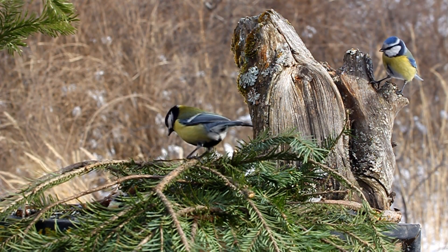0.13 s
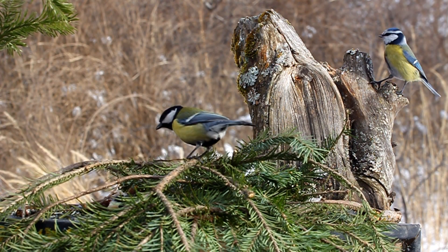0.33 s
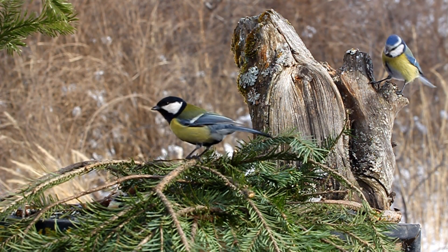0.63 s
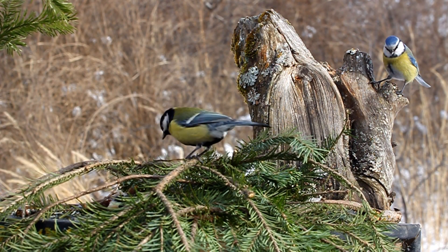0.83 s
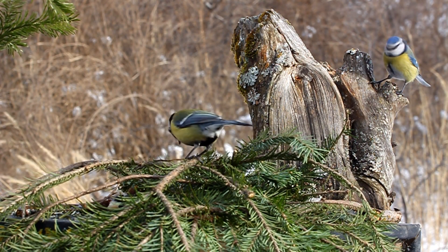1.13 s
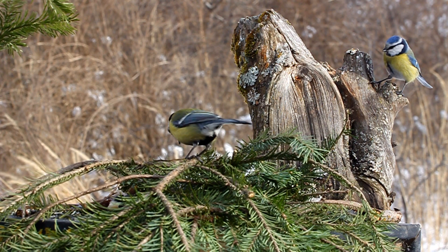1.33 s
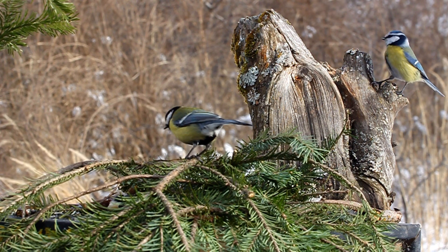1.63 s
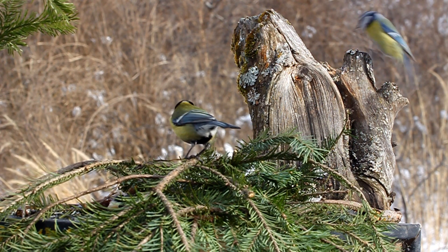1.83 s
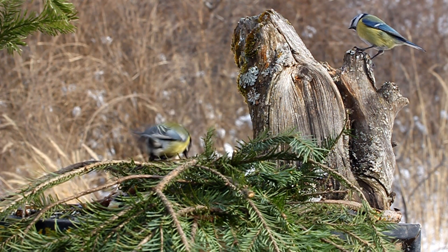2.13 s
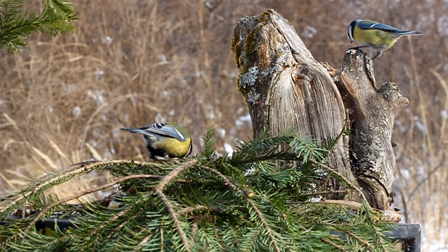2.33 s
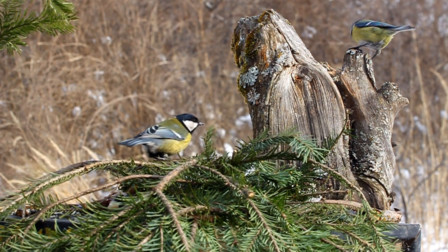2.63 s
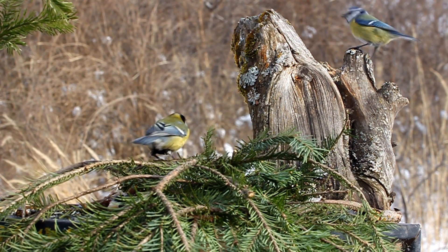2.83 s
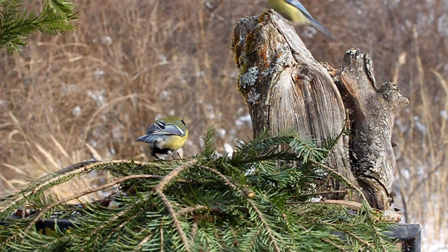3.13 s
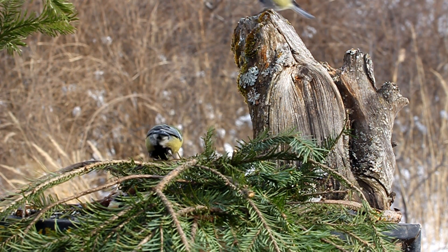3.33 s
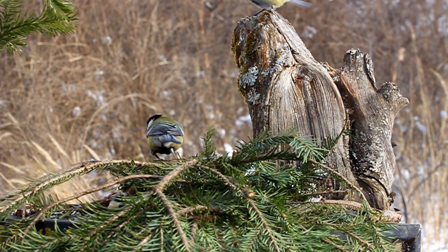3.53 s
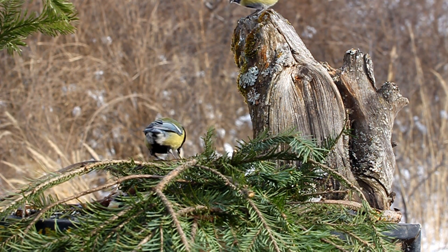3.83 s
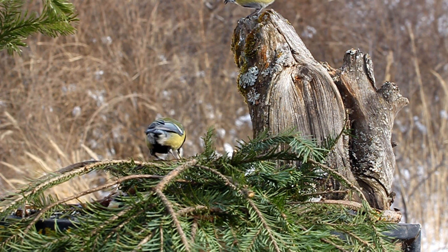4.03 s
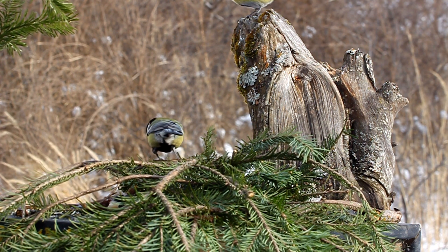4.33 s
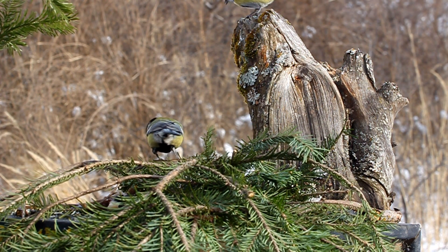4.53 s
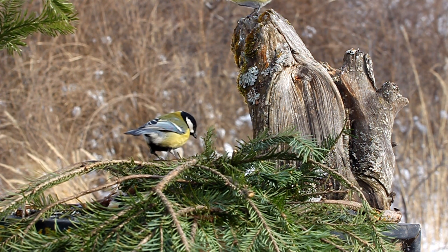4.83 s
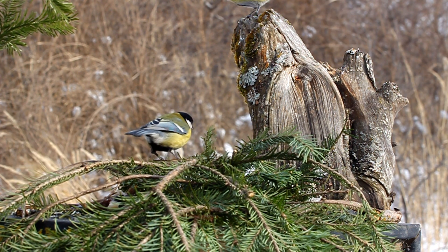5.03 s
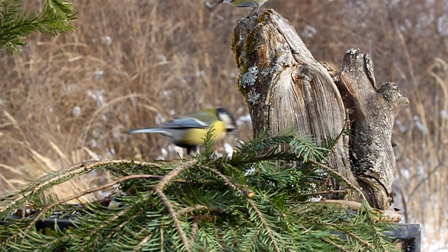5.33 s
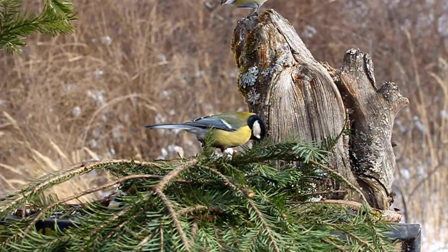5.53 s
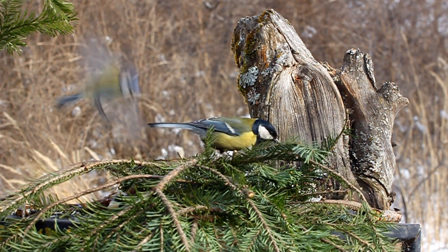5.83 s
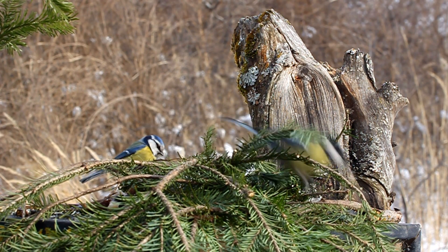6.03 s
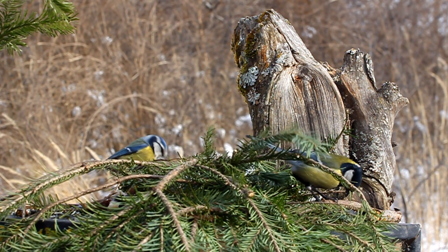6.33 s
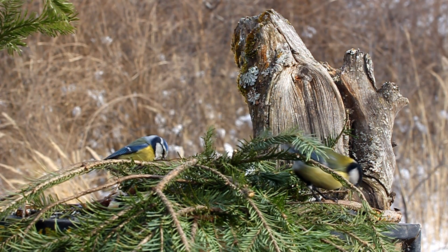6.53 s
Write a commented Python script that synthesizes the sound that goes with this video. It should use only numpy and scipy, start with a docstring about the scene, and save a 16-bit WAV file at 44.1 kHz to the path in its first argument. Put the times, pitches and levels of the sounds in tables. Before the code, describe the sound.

Small birds give short, sharp, high chirps and thin whistles outdoors, with faint ticks and rustles over a soft steady hiss.

```python
"""A winter field, where great and blue tits feed on spruce branches. One gives sharp rising 'tsit' notes close
by; thin arched whistles come from farther off, and more tsits sound from behind cover, their treble dulled. The
two sides of the syrinx sing slightly apart and beat. Beaks and claws tick, wings rustle, and the air hisses
faintly over a far rumble. A stump reflects the sound; stems scatter it, and a farther trunk returns a later
cluster of echoes."""
import sys
import numpy as np
from scipy import signal
from scipy.fft import rfft, irfft
from scipy.io import wavfile
from scipy.ndimage import uniform_filter1d

SR = 44100
rng = np.random.default_rng(int(sys.argv[2]) if len(sys.argv) > 2 else 0)


def wrap_up_sound(samples):
    """Save the sound to the file named by the first command line argument, as 16-bit audio."""
    columns = np.atleast_2d(samples).T
    # keep every value between -1 and 1, then stretch to whole-number steps
    tamed = np.clip(columns, -1, 1)
    steps = np.round(tamed * 32767).astype(np.int16)
    wavfile.write(sys.argv[1], SR, steps)


N = 295470
TIME = np.arange(N) / SR
TREBLE_LIMIT_HZ = 13900  # of the hiss, ticks and rustles


def from_db(db):
    """Amplitude ratio of a level in decibels."""
    return 10 ** (np.asarray(db) / 20)


def rms_one(x):
    """Normalisation to rms 1."""
    return x / np.sqrt(np.mean(x ** 2) + 1e-20)


def past(x):
    """Ramp function: how far x is above zero."""
    return np.maximum(x, 0)


def s_curve(x):
    """Logistic step from 0 to 1 around x = 0."""
    return (1 + np.tanh(x / 2)) / 2


def blend(ends, share):
    """Linear interpolation from the first value at share 0 to the second at share 1."""
    return ends[0] + (ends[1] - ends[0]) * share


def follow(rows, t):
    """Linear interpolation of each column of a curve at the times t."""
    times, *columns = np.transpose(rows)
    return [np.interp(t, times, column) for column in columns]


def add(track, s, sound):
    """Superposition of a sound on the track from time s."""
    start = max(round(s * SR), 0)
    track[start:start + len(sound)] += sound[:max(N - start, 0)]


def delayed(x, ms):
    """Propagation delay along a longer path."""
    return np.interp(TIME - ms / 1000, TIME, x, left=0)


def resonance(x, hz, width_hz):
    """Two-pole resonator with unit gain at its peak."""
    r = np.exp(-np.pi * width_hz / SR)
    feedback = [1, -2 * r * np.cos(2 * np.pi * hz / SR), r * r]
    return signal.lfilter(np.array([1, 0, -1]) * (1 - r * r) / 2, feedback, x)


def low_pass(x, hz):
    """Steep elliptic low-pass."""
    return signal.sosfilt(signal.ellip(10, .1, 80, hz, fs=SR, output="sos"), x)


def soften(x, hz):
    """Gentle second-order low-pass."""
    return signal.sosfilt(signal.butter(2, min(hz, .45 * SR), fs=SR, output="sos"), x)


def coloured_noise(spectrum):
    """Spectral shaping of white noise, rms 1."""
    hz, db = np.transpose(spectrum)
    bins_hz = np.maximum(np.arange(N // 2 + 1) * SR / N, 1)
    gain = from_db(np.interp(np.log(bins_hz), np.log(hz), db))
    return rms_one(irfft(rfft(rng.standard_normal(N)) * gain, N))


def waver(like, size):
    """Random modulation of rms 1, correlated over about `size` samples."""
    return rms_one(uniform_filter1d(uniform_filter1d(rng.standard_normal(len(like)), size), size))


def air(whir_db=-11, whir_hz=1570, width_hz=260):
    """Broadband noise: a far rumble, with a faint narrowband whir that follows it, under a hiss."""
    # slow drift of the background: (time [s], relative rumble level [dB], relative hiss level [dB])
    levels = [(0.0, -75.5, -66.5), (0.5, -75, -70), (3.55, -70.5, -64.5), (4.25, -71.5, -67.5),
              (4.42, -71, -65.5), (4.81, -70, -66), (6.32, -70, -66.5), (6.7, -70.5, -64.5)]
    # spectrum of the rumble: (frequency [Hz], relative spectral density [dB])
    rumble_spectrum = [(12, -50), (20, -17), (91, -6.5), (134, 0.5), (219, -2.5), (310, 0), (403, -2.5),
                       (456, -3), (572, -4), (783, -11), (917, -17), (1300, -18.5), (1690, -54),
                       (2860, -120)]
    # spectrum of the hiss: (frequency [Hz], relative spectral density [dB])
    hiss_spectrum = [(530, -32), (900, -7), (1340, -11), (1570, -10.5), (1860, -7), (2360, -6), (2580, -6),
                     (3790, -4.5), (4500, -4.5), (7240, -1.5), (8580, -4), (12500, -5.5), (13500, -7.5)]
    rumble_db, hiss_db = follow(levels, TIME)
    whir = rms_one(resonance(resonance(rng.standard_normal(N), whir_hz, width_hz), whir_hz, width_hz))
    rumble = coloured_noise(rumble_spectrum) + from_db(whir_db) * whir
    hiss = low_pass(coloured_noise(hiss_spectrum), TREBLE_LIMIT_HZ)
    return from_db(rumble_db + 1) * rumble + from_db(hiss_db + 1.5) * hiss


def brush(x, t60_s, build_s):
    """Scattering: stems and trunks return many small echoes that build up and decay exponentially."""
    t = TIME[:SR // 2]
    echoes = rng.standard_normal(len(t)) * (rng.random(len(t)) < .1)
    echoes *= from_db(-60 * t / t60_s) * (1 - np.exp(-t / build_s))
    return signal.fftconvolve(x, echoes / np.sqrt(np.sum(echoes ** 2)))[:N]


def twig(force, hz, relative_width, ring_db, ring_width_hz):
    """Forced vibration of a twig or husk: a broad, heavily damped resonance and a brief woody ring."""
    knock = resonance(resonance(force, hz, relative_width * hz), hz, relative_width * hz)
    return knock + from_db(ring_db) * resonance(force, hz, ring_width_hz)


def rustles(snaps_per_s=1800, clump_db=2.5):
    """Friction: feathers brush the needles in a short swell of tiny snaps that ring in the twig."""
    # wing strokes on the needles: (peak time [s], half length [s], level [dB], centre frequency [Hz])
    strokes = [(1.258, 0.014, -66.5, 3600), (1.792, 0.048, -70, 2480), (2.393, 0.018, -63, 7000),
               (2.794, 0.08, -67.5, 8100), (5.26, .007, -62.5, 3240), (5.422, 0.15, -67, 3900)]
    out = np.zeros(N)
    for s, half_s, db, hz in strokes:
        t = np.arange(-2 * half_s, 2 * half_s, 1 / SR)
        snaps = rng.standard_normal(len(t)) * (rng.random(len(t)) < snaps_per_s / SR)
        snaps *= from_db(clump_db * waver(t, size=500))
        rustle = rms_one(twig(snaps, hz, relative_width=1.0, ring_db=-1, ring_width_hz=500))
        add(out, s + t[0], from_db(db) * np.exp(-(t / half_s) ** 2) * rustle)
    return out


def patter(span_s=(1.2, 3.0), per_s=5, range_db=(-56.5, -50.5), centre_hz=8000):
    """Random faint impacts as a bird hops and pecks: (time [s], relative peak [dB], frequency [Hz])."""
    count = round(per_s * (span_s[1] - span_s[0]))
    return [(blend(span_s, when), blend(range_db, size), centre_hz * 2 ** (colour - .5))
            for when, size, colour in rng.random((count, 3))]


def ticks(decay_cycles=11):
    """Impact excitation: beak or claw cracks against seed and twig; low-pitched contacts last longer."""
    # the clearest contacts: (time [s], relative peak level [dB], centre frequency [Hz])
    contacts = [(0.6493, -39.5, 7440), (1.469, -55, 1850), (1.9779, -49, 4900), (2.137, -42.5, 4550),
                (2.3817, -44, 8470), (2.3964, -42, 7410), (2.5212, -43, 5560), (2.5493, -47.5, 2980),
                (2.8774, -50, 2970), (3.5184, -39.5, 11300), (5.2614, -46, 5410), (5.375, -43, 11300),
                (6.649, -32, 6450)]
    out, t = np.zeros(N), TIME[:SR // 40]
    for s, db, hz in list(contacts) + patter():
        force = rng.standard_normal(len(t)) * np.exp(-t * hz / decay_cycles)
        crack = twig(force, hz, relative_width=3.2, ring_db=4, ring_width_hz=450)
        add(out, s, from_db(db - 1) * crack / np.abs(crack).max())
    return out


def syrinx(hz, gap_hz, second_db, octave_db, subharmonic_db, jitter):
    """Two near-sine voices beat; their squared sum gives the octave, uneven cycles give subharmonics."""
    pitches = [f * (1 + jitter * waver(hz, size=60)) for f in (hz, hz + gap_hz)]
    phase = 2 * np.pi * (np.cumsum(pitches, axis=1) / SR + rng.random((2, 1)))
    tone = np.exp(1j * phase[0]) + from_db(second_db) * np.exp(1j * phase[1])
    uneven = 1 + 2 * from_db(subharmonic_db) * np.cos(phase[0] / 2)
    return np.sqrt(2) * (uneven * tone + from_db(octave_db) * tone ** 2).imag


def whistles(attack_s=0.0044, release_s=0.012, fade_db_per_s=25, flutter_db=2.05):
    """Frequency-modulated notes swell to a crest and fade; returns direct sound and sound to scatter."""
    # far whistles: (crest time [s], level [dB], length before the crest [s], length after it [s],
    # pitch factor [ratio], tilt [octaves/s], swell [dB/s], relative echo level [dB])
    notes = [(.108, -50.5, 0.043, 0.062, 1, -0.57, 260, -23),
             (.283, -52.5, .06, 0.061, 1.018, .3, 110, -13), (4.278, -51.5, 0.06, 0.048, 1.0, .1, 30, -8),
             (6.612, -43, .069, 0.059, 0.985, -0.11, 115, -27)]
    # pitch contour of dip, shoulder, crest and fall:
    # (time from the crest [s], frequency before pitch factor and tilt [Hz], gap between voices [Hz])
    arch = [(-.07, 7950, 100), (-.05, 6980, 220), (-.036, 6500, 330), (-.022, 7300, 320),
            (-.011, 7350, 320), (0, 7880, 290), (.015, 7000, 410), (.036, 6330, 420), (.064, 5700, 430)]
    direct, scattered = np.zeros((2, N))
    for crest_s, db, before_s, after_s, pitch, tilt, swell_db_per_s, echo_db in notes:
        t = np.arange(-before_s, after_s, 1 / SR)
        arch_hz, gap_hz = follow(arch, t)
        hz = arch_hz * pitch * 2 ** (tilt * t)
        voice = syrinx(hz, gap_hz, second_db=-7.5, octave_db=-28, subharmonic_db=-34, jitter=0.0077)
        gate = np.clip((t + before_s) / attack_s, 0, 1) * np.clip((after_s - t) / release_s, 0, 1)
        envelope_db = db - swell_db_per_s * past(-t) - fade_db_per_s * past(t)
        note = from_db(envelope_db + flutter_db * waver(t, size=300)) * gate * voice
        add(direct, crest_s - before_s, note)
        add(scattered, crest_s - before_s, from_db(echo_db) * note)
    return direct, scattered


def rasp(ms, length_ms, climb, full_at_ms=-3, swell_db_per_ms=3.5, cut_db_per_ms=5):
    """Flow noise of air rushing through the syrinx, strongest at the foot of the sweep."""
    gate_db = -swell_db_per_ms * past(full_at_ms - ms) - cut_db_per_ms * past(ms - length_ms)
    rush = resonance(rng.standard_normal(len(ms)), hz=8800, width_hz=6500)
    return from_db(blend((-15.5, -25), climb) + gate_db) * rms_one(soften(rush, hz=14500))


def tsit_envelope_db(ms, length_ms, full_at_ms=0.71, sag_at_ms=3.95):
    """Amplitude envelope that swells, holds, sags and is cut off, with slopes in dB per ms."""
    return -6.5 * past(full_at_ms - ms) - 1.0 * past(ms - sag_at_ms) - 8 * past(ms - length_ms)


def tsit(ms, length_ms, pitch, gap_hz, ledge, ledge_hz, harsh_db, uneven_db,
         span_hz=(3122, 7210), sweep_ms=1.39, ledge_ms=1.34, ledge_db=1.5,
         clear_at_ms=-1.7, clear_ms=0.71, join_at_ms=-1.3):
    """A frequency sweep of over an octave in a few ms; returns the voice and its climb from 0 to 1."""
    climb = s_curve(ms / sweep_ms)
    sweep_hz = pitch * blend(span_hz, climb)
    # the sweep may linger on a throat resonance, making a ledge in the pitch
    passing_ms = np.interp(ledge_hz, sweep_hz, ms)
    caught = ledge * np.exp(-((ms - passing_ms) / ledge_ms) ** 4)
    hz = blend((sweep_hz, ledge_hz), caught)
    # the second voice joins in mid-sweep and gains on the first; slopes in dB per ms
    second_db = -9 + 0.47 * ms - 6.5 * past(join_at_ms - ms)
    # the tone clears as it climbs
    clear = s_curve((ms - clear_at_ms) / clear_ms)
    octave_db = blend((7, -22.5), climb) + harsh_db
    subharmonic_db = blend((0, -40), clear) + uneven_db
    voice = syrinx(hz, gap_hz, second_db, octave_db, subharmonic_db, jitter=0.01)
    return from_db(tsit_envelope_db(ms, length_ms) + ledge_db * caught) * voice, climb


def tsits(rasp_db=3.0, echo_db=-25, diffraction_hz=1900, low_loss_share=0.37):
    """Cover shadows the treble while lows diffract round it; returns direct sound and sound to scatter."""
    # sharp notes: (mid-sweep time [s], level [dB], length from mid-sweep to the cut [ms],
    # pitch factor [ratio], gap between voices [Hz], lingering [0-1], throat resonance [Hz],
    # harshness [dB], subharmonic boost [dB], treble loss on the direct path [dB])
    notes = [(0.6053, -22, 12, 1.016, 777, 0.5, 5850, 1.5, -12, 0.5),
             (0.7549, -25.5, 7.6, 1.013, 624, 0.95, 5520, 0, 1, -0.5),
             (3.0539, -21.5, 10.6, 0.99, 665, 0.8, 5150, 1, 1, -1),
             (3.1466, -19, 12, 1.007, 650, 0.4, 4700, -0.5, -2, 1.5),
             (3.269, -18, 11.4, 0.995, 680, 0, 5300, -0.5, 4.5, 3.5),
             (3.4133, -19, 11.7, 1.01, 690, 0, 6000, -3.5, 1.5, 1.8),
             (4.216, -21, 15, 0.95, 600, 0, 6000, 1, 3, 36),
             (4.3295, -17, 13, .98, 660, 0, 6000, 2.5, 3, 40),
             (4.45, -17.5, 12, .98, 647, 0, 6000, 3, 2, 35),
             (4.5783, -18, 12, 1, 646, 0.24, 6000, 6.5, 5, 36),
             (5.1857, -32.5, 9.8, 0.94, 600, 0.5, 6300, 0, -5, 27.5),
             (5.8187, -38, 19, 1.04, 300, 0, 6000, -5, -5, 32)]
    direct, scattered = np.zeros((2, N))
    for s, db, length_ms, pitch, gap_hz, ledge, ledge_hz, harsh_db, uneven_db, loss_db in notes:
        ms = np.arange(-10, length_ms + 5, 1000 / SR)  # zero at mid-sweep
        voice, climb = tsit(ms, length_ms, pitch, gap_hz, ledge, ledge_hz, harsh_db, uneven_db)
        note = voice + from_db(rasp_db + harsh_db) * rasp(ms, length_ms, climb)
        treble_gain, low_gain = from_db(-loss_db), from_db(-low_loss_share * loss_db)
        diffracted = (low_gain - treble_gain) * soften(soften(note, diffraction_hz), diffraction_hz)
        start_s = s - np.sum(ms < 0) / SR
        add(direct, start_s, from_db(db) * (treble_gain * note + diffracted))
        add(scattered, start_s, from_db(db + echo_db) * voice)  # the cover spares the echo
    return direct, scattered


def scene():
    """Superposition of the birds, their echoes from stump, perch, field and a farther trunk, and air."""
    calls, scattered = np.add(tsits(), whistles())
    direct = calls + low_pass(ticks() + rustles(), TREBLE_LIMIT_HZ)
    stump = from_db(-18) * delayed(direct, ms=8.5)  # one early reflection from beside the perch
    perch = from_db(-21) * brush(direct, t60_s=.05, build_s=.003)
    held_treble = resonance(scattered, hz=7060, width_hz=1800)  # thin stems return mostly this part
    field = from_db(-2.5) * brush(held_treble, t60_s=0.27, build_s=0.0041)
    trunk = from_db(-11.5) * delayed(brush(scattered, t60_s=0.077, build_s=.003), ms=38)
    return (direct + stump + perch + field + trunk + air())[None]


def record(dry):
    """Band limiting: the highest treble is cut."""
    return low_pass(dry, hz=15800)


dry = scene()
out = record(dry)
wrap_up_sound(out)
```